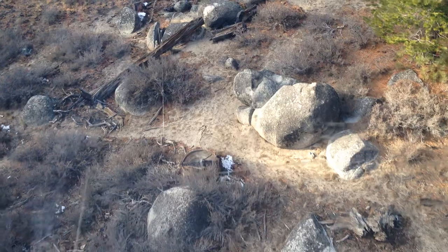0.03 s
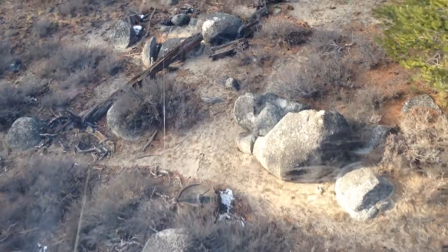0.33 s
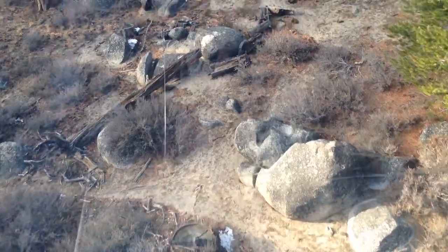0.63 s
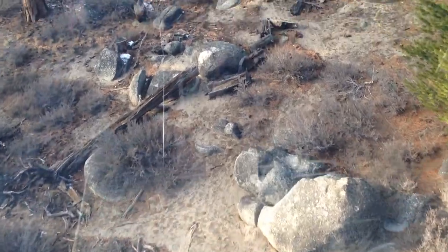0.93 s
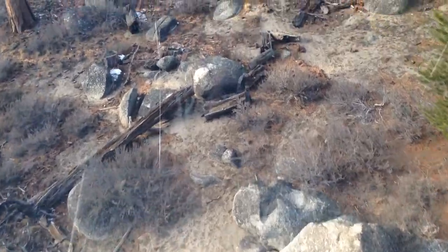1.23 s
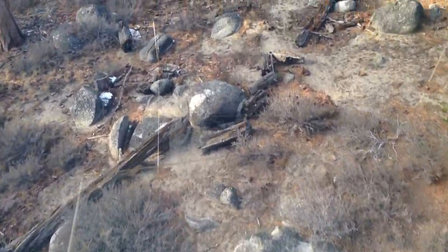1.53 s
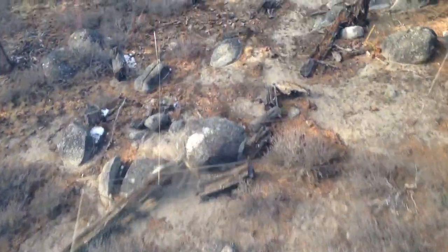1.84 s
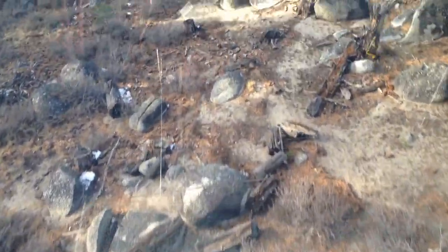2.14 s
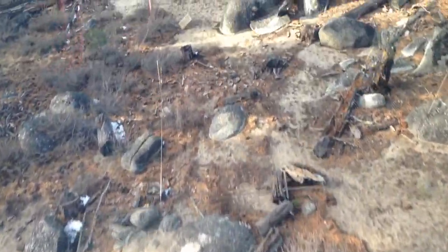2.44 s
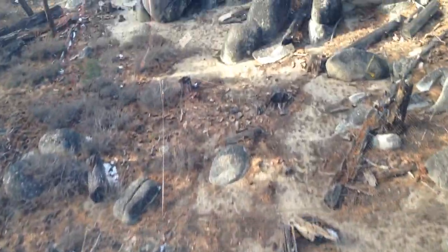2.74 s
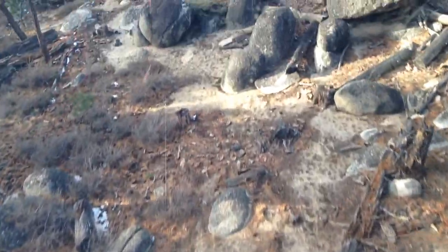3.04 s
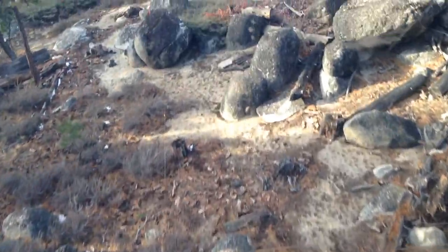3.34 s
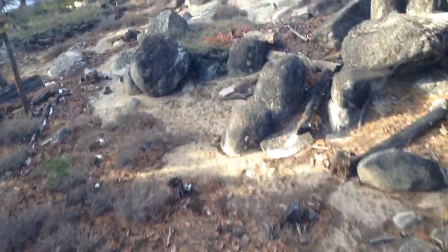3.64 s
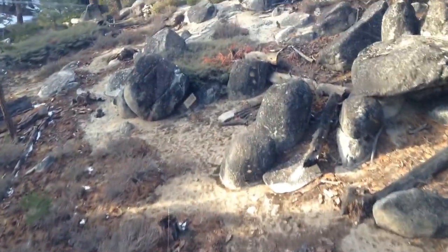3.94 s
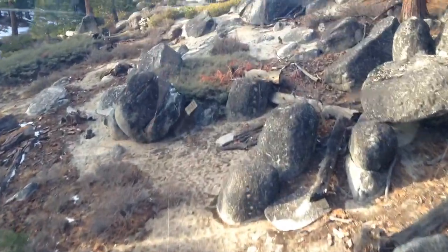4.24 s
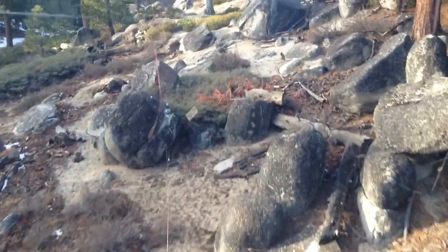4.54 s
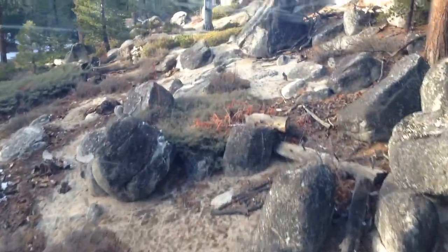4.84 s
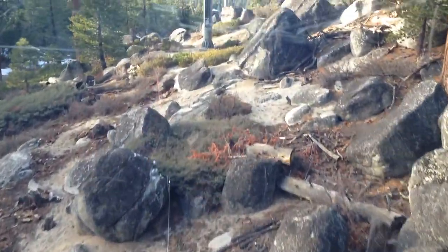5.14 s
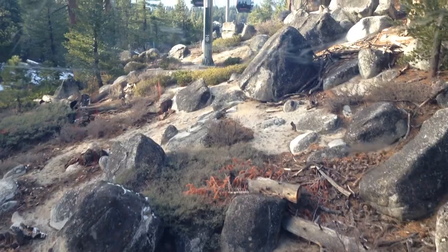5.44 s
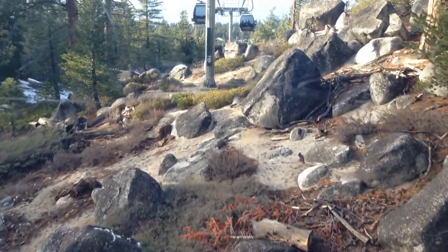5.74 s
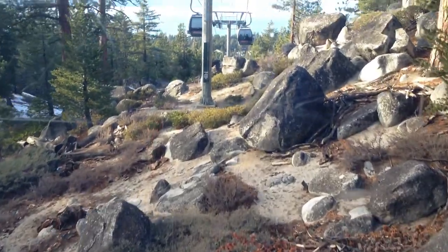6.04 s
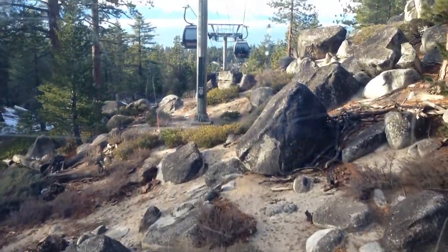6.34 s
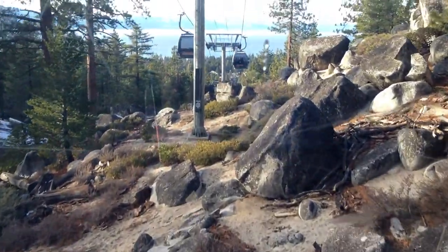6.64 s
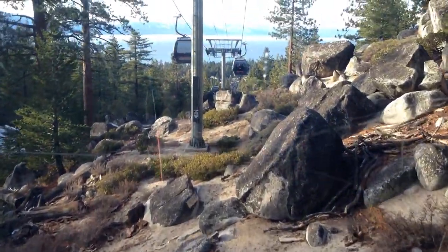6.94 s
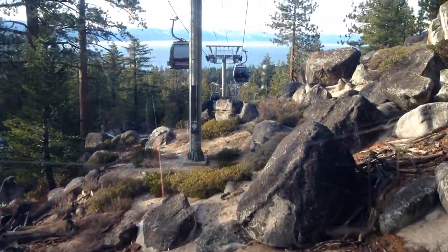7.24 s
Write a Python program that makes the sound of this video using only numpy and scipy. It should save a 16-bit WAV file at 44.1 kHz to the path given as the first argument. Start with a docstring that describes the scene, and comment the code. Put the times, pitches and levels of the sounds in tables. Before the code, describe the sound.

Heard from within a moving cable car, a soft, unevenly throbbing low drone fills the cabin while air slides faintly past outside. Small thuds and ticks come now and then. Late on, a single sharp clunk, by far the loudest sound, shakes the panels and a loose fitting. About a second later there is a tiny snap, then a faint rustle of clothing and a few more ticks over the continuing rumble.

```python
"""Inside a small gondola cabin gliding up a mountainside on its cable.
From the start the rope's vibration rumbles in the shell and booms in the cabin air; wind rushes faintly.
For five seconds the cabin heaves now and then, while the floor bumps, fittings tick and cloth rustles.
At 5.4 s, after a faint, brief lead-in of noise, one hard clunk rings the panels and rattles a fitting.
A tiny bright snap follows at 6.4 s, and the ride rumbles on with a few more ticks and a rustle."""
import sys
import numpy as np
from scipy import signal
from scipy.fft import rfft, irfft, next_fast_len
from scipy.io import wavfile
from scipy.ndimage import uniform_filter1d

SR = 44100
rng = np.random.default_rng(int(sys.argv[2]) if len(sys.argv) > 2 else 0)


def wav_out(sig):
    """Save sig, one row per channel (or a flat mono array), as 16-bit PCM at SR to the path in sys.argv[1]."""
    wavfile.write(sys.argv[1], SR, np.round(np.clip(np.atleast_2d(sig).T, -1, 1) * 32767).astype(np.int16))


N = 325899
TIME = np.arange(N) / SR

# spectra of the microphone hiss and the air rush: frequency_hz, relative_density_db
HISS_SPECTRUM = [(1000, -3), (2000, 0), (2700, -3.5), (3500, -0.5), (5000, -1.5), (8000, -3), (12000, -4),
                 (16000, -4.5)]
WIND_SPECTRUM = [(180, 10.5), (300, -6.5), (450, 1), (600, -4.5), (850, -7), (1200, -13), (1900, -19),
                 (2700, -26), (5000, -39)]
# air sliding past the shell: time_s, level_db
WIND_LEVEL = [(0.1, -57.5), (1.6, -62), (2.0, -60), (2.35, -65), (2.7, -58.5), (3.1, -61.5), (4.9, -59.5),
              (6.25, -64.5), (6.55, -60.5), (7.38, -61)]
# narrow tones that the running rope keeps up in the hanger: pitch_hz, width_hz, level_db
HANGER_MODES = [(301.9, 20.5, -63.5), (274, 32, -67.5), (348.8, 29, -69), (409, 44, -71), (533.3, 7.5, -78),
                (801, 14, -80.5)]
# resonances of cabin air and shell: pitch_hz, width_hz, relative_db
SWAY_MODES = [(33.1, 9.3, -10.5), (50, 51, -5)]
BOOM_MODES = [(89.5, 12, 5), (69.8, 27, -8)]
DRONE_MODES = [(118.5, 19.5, 1), (148.7, 33.2, 0), (181.4, 37, -10.5), (234.7, 19, -12)]
# how hard the running rope drives the boom: time_s, relative_db
ROPE_DRIVE = [(0.1, -43), (0.35, -44), (0.72, -40), (1.05, -48.5), (1.45, -47), (2.2, -43.5), (2.65, -41),
              (3.15, -45), (3.7, -34.5), (4.0, -41), (4.25, -40), (4.75, -41), (5.1, -45), (5.72, -37.5),
              (5.88, -48), (6.15, -38.5), (6.68, -45.5), (7.38, -38.5)]
# gusts and tugs of the rope that make the cabin heave: centre_s, level_db, pitch_hz
HEAVES = [(0.43, -38, 42), (0.535, -33, 58), (0.8, -43, 36), (1.87, -42, 127), (2.209, -37, 128),
          (2.68, -36, 87.6), (3.08, -37.5, 71), (3.23, -40.5, 86), (3.55, -37, 73), (3.832, -34.5, 92.6),
          (4.14, -36.5, 97.5), (4.68, -42, 92)]
# dull bumps through the floor: start_s, level_db
BUMPS = [(0.43, -63), (1.49, -62), (1.71, -63), (2.082, -58.5), (2.153, -58.5), (2.39, -64.5), (2.67, -60),
         (3.895, -62), (6.42, -62)]
# light ticks and, at 5.432 s, a faint, brief lead-in of noise just before the clunk: start_s, relative_db
BURSTS = [(2.0806, -73), (2.1524, -72), (3.0045, -79), (4.096, -75), (4.8428, -73), (5.432, -57.5),
          (6.494, -75), (6.5978, -69), (7.1201, -65.5)]
# spectra of soft bumps and of hard or rubbing contact: frequency_hz, relative_density_db
BUMP_SPECTRUM = [(250, -10), (600, 8), (1100, 1), (1800, -9), (2600, -15), (6000, -41)]
CONTACT_SPECTRUM = [(300, 7), (1000, 16), (1900, 15.5), (2700, 14.5), (3600, 13.5), (5500, 12.5),
                    (8000, -3), (15000, -40)]
# soft rubbing of cloth: centre_s, length_s, level_db
RUSTLES = [(2.15, .1, -79), (4.067, 0.07, -69), (6.758, 0.29, -70.5)]
# a tiny bright double snap: start_s, relative_db, pitch_hz
SNAPS = [(6.4138, -57, 13500), (6.4186, -43, 6600)]
# a loose metal fitting striking its seat: start_s, relative_db
RATTLE_HITS = [(3.0045, -68), (5.451, -41), (5.478, -46), (5.497, -56), (5.522, -55)]
# resonances of that fitting: pitch_hz, width_hz, relative_db
RATTLE_MODES = [(2020, 200, -0.5), (2340, 230, -3.5), (3200, 140, -15), (3930, 280, -30)]
# the clunk and its rebounds: start_s, relative_db
CLUNK_HITS = [(5.4395, -7), (5.443, 1.5), (5.4520, -11), (5.464, -2.5), (5.4740, -24), (5.4815, -31),
              (5.549, -32)]
# modes of the wall panels: pitch_hz, relative_db, t60_s
PANEL_MODES = [(99, -6, .48), (149, -2, .3), (165, -7, .4), (190, -7, .24), (218, -6, .3), (273, -9, .36),
               (308, -7, .24), (342, -11, .23), (367, -17, .42), (400, -9, .2), (426, -6, .34),
               (445, -9, .23), (468, -12, .28), (496, -7, .2), (532, -17, .25), (615, -15, .22),
               (660, -13.5, .29), (711, -12, .18), (742, -15, .18), (812, -14, .18), (853, -16, .22),
               (984, -19, .22), (1026, -19, .19), (1135, -20, .21), (1578, -23, .19), (1750, -26, .2),
               (1795, -25, .22), (1915, -23, .22), (2026, -26, .22), (2090, -26, .2), (2343, -24, .19),
               (2730, -31, .18), (3330, -32, .19)]
# dense ring of shell and cabin after a blow: frequency_hz, relative_density_db
SHELL_SPECTRUM = [(100, 4), (200, -12), (450, 6.5), (600, -12), (780, -5), (1100, -12), (1300, -9.5),
                  (2100, -16), (2600, -21.5), (3700, -24), (4300, -30), (5500, -26), (6700, -32.5),
                  (8000, -40.5), (15000, -56)]
# decay of that ring: frequency_hz, t60_s
SHELL_DECAY = [(100, 0.6), (200, 0.34), (400, 0.23), (1000, 0.18), (2000, 0.17), (4000, 0.13),
               (12000, 0.14)]


def from_db(db):
    """Amplitude grows tenfold with every 20 dB."""
    return 10 ** (np.asarray(db) / 20)


def unit_power(x):
    """Division by the RMS value leaves a mean power of one."""
    return x / np.sqrt(np.mean(x ** 2) + 1e-20)


def steady(x, span_s):
    """Division by the running RMS value evens out the slow swells of a noise."""
    return x / np.sqrt(uniform_filter1d(x ** 2, int(span_s * SR)) + 1e-12)


def in_time(curve):
    """Linear interpolation gives a curve's value at every sample."""
    return np.interp(TIME, *np.transpose(curve))


def at_hz(table, hz):
    """Interpolation on a log-frequency axis gives each octave equal room."""
    frequencies, values = np.transpose(table)
    return np.interp(np.log(hz + 1e-9), np.log(frequencies), values)


def shaped_noise(gain_at):
    """Filtered white noise takes on the spectrum of its filter; the result has unit power."""
    size = next_fast_len(N, real=True)
    hz = np.arange(size // 2 + 1) * SR / size
    white = rfft(rng.standard_normal(size))
    return unit_power(irfft(white * gain_at(hz), size)[:N])


def coloured(spectrum):
    """Spectral shaping: noise follows the table and falls 18 dB per octave below its first point."""
    lowest_hz = spectrum[0][0]
    return shaped_noise(lambda hz: from_db(at_hz(spectrum, hz)) * np.minimum(hz / lowest_hz, 1) ** 3)


def wander(rate_hz):
    """Band-limited noise fluctuates smoothly, with unit spread, at rates near rate_hz."""
    return shaped_noise(lambda hz: hz * np.exp(-np.minimum(hz / rate_hz, 10) ** 2 / 2))


def resonating(modes):
    """Under random forcing each resonance passes a narrow band of noise."""
    out = 0
    for hz, width_hz, db in modes:
        edges_hz = [max(hz - width_hz / 2, 10), hz + width_hz / 2]
        band = signal.butter(2, edges_hz, "band", fs=SR, output="sos")
        settled = signal.sosfilt(band, rng.standard_normal(N + SR))[SR:]
        out = out + from_db(db) * unit_power(settled)
    return out


def swell(centre_s, length_s):
    """A Gaussian envelope rises and falls symmetrically about its centre."""
    return np.exp(-np.minimum((2 * (TIME - centre_s) / length_s) ** 2, 20))


def impulses(rows):
    """A brief excitation acts as an impulse, one for each (start_s, level_db)."""
    out = np.zeros(N)
    for start_s, db in rows:
        out[round(start_s * SR)] += from_db(db)
    return out


def decay(hits, t60_s):
    """Energy adds with each impulse and drains exponentially; the envelope is its square root."""
    energy_kept = 10 ** (-6 / (t60_s * SR))
    return np.sqrt(signal.lfilter([1], [1, -energy_kept], hits ** 2 + 1e-24))


def ring(force, hz, t60_s):
    """A damped oscillator answers a unit impulse with a dying sine of height one."""
    radius, angle = from_db(-60 / (t60_s * SR)), 2 * np.pi * hz / SR
    feedback = [1, -2 * radius * np.cos(angle), radius ** 2]
    return signal.lfilter([0, np.sin(angle)], feedback, force + 1e-18)


def wind(flutter_db, flutter_hz):
    """Flow noise: air sliding past the shell makes a broad rush that flutters slightly."""
    level_db = in_time(WIND_LEVEL) + flutter_db * wander(flutter_hz)
    return from_db(level_db) * coloured(WIND_SPECTRUM)


def rope_rumble(sway_db, drone_db, boom_gain_db, throb_db, throb_hz):
    """Forced vibration: the rope drives shell, cabin air and hanger, and the boom throbs unevenly."""
    boom_db = in_time(ROPE_DRIVE) + boom_gain_db + throb_db * np.tanh(wander(throb_hz))
    sway = from_db(sway_db) * steady(resonating(SWAY_MODES), span_s=0.2)
    boom = from_db(boom_db) * steady(resonating(BOOM_MODES), span_s=0.16)
    drone = from_db(drone_db) * steady(resonating(DRONE_MODES), span_s=0.24)
    return sway + boom + drone + resonating(HANGER_MODES)


def heaves(length_s, relative_bandwidth):
    """Transient forcing: each gust or tug of the rope raises a short, deep swell of narrow-band noise."""
    out = 0
    for centre_s, db, hz in HEAVES:
        shudder = steady(resonating([(hz, relative_bandwidth * hz, 0)]), span_s=0.05)
        out = out + from_db(db) * swell(centre_s, length_s) * shudder
    return out


def floor_bumps(t60_s):
    """Soft impacts carry little treble, so jolts thud dully in the floor."""
    return coloured(BUMP_SPECTRUM) * decay(impulses(BUMPS), t60_s)


def bursts_and_rustles(burst_t60_s, echo_db, echo_t60_s):
    """Reverberation and friction: ticks and the clunk's faint lead-in echo; cloth rubs in grainy swells."""
    onsets = impulses(BURSTS)
    bursts = decay(onsets, burst_t60_s) + from_db(echo_db) * decay(onsets, echo_t60_s)
    rubbing = sum(from_db(db) * swell(centre_s, length_s) for centre_s, length_s, db in RUSTLES)
    grain = unit_power(uniform_filter1d(rng.exponential(1, N) ** 3, size=150))
    return coloured(CONTACT_SPECTRUM) * (bursts + rubbing * grain)


def snaps(contact_t60_s, echo_db, echo_t60_s, ring_db):
    """A small hard part radiates little below its lowest mode: its click is all treble, briefly echoed."""
    out = 0
    for start_s, db, hz in SNAPS:
        hit = impulses([(start_s, db)])
        envelope = decay(hit, contact_t60_s) + from_db(echo_db) * decay(hit, echo_t60_s)
        burst = rng.standard_normal(N) * envelope
        click = burst + from_db(ring_db) * ring(burst, hz, t60_s=0.003)
        highpass = signal.cheby1(10, 1, 0.95 * hz, "high", fs=SR, output="sos")
        out = out + signal.sosfilt(highpass, click)
    return out


def rattle(t60_s, buzz_db, buzz_centre_s, buzz_length_s):
    """Repeated impacts excite a loose fitting's modes, hardest just after the clunk; then it buzzes."""
    chatter = decay(impulses(RATTLE_HITS), t60_s)
    buzz = from_db(buzz_db) * swell(buzz_centre_s, buzz_length_s)
    return resonating(RATTLE_MODES) * (chatter + buzz)


def panel_ring(travel_s):
    """Bending waves from the blow reach each panel in their own time and leave it in free vibration."""
    arrivals_s = CLUNK_HITS[0][0] + travel_s * rng.random(len(PANEL_MODES))
    out = 0
    for k, (hz, db, t60_s) in enumerate(PANEL_MODES):
        polarity = (-1) ** k
        out = out + polarity * ring(impulses([(arrivals_s[k], db)]), hz, t60_s)
    return out


def shell_ring():
    """Modal overlap: blow and rebounds stir countless modes, heard as noise that dies band by band."""
    hits, dense_modes = impulses(CLUNK_HITS), coloured(SHELL_SPECTRUM)
    edges_hz = np.geomspace(70, 17000, 9)
    out = 0
    for low, high in zip(edges_hz, edges_hz[1:]):
        band = signal.butter(3, [low, high], "band", fs=SR, output="sos")
        t60_s = at_hz(SHELL_DECAY, np.sqrt(low * high))
        out = out + signal.sosfilt(band, dense_modes) * decay(hits, t60_s)
    return out


def clunk(panel_gain_db, shell_gain_db, crack_gain_db, crack_t60_s):
    """Impulse response: a hard blow cracks at first contact and rings on in panels and shell."""
    panels = from_db(panel_gain_db) * panel_ring(travel_s=0.003)
    shell = from_db(shell_gain_db) * shell_ring()
    crack = coloured(CONTACT_SPECTRUM) * decay(impulses(CLUNK_HITS[:1]), crack_t60_s)
    return panels + shell + from_db(crack_gain_db) * crack


def scene():
    """Superposition: the sounds of all sources add at a seat in the cabin."""
    cabin = wind(flutter_db=0.36, flutter_hz=5.6)
    cabin += rope_rumble(sway_db=-48.5, drone_db=-50, boom_gain_db=-2, throb_db=2.5, throb_hz=4.8)
    cabin += heaves(length_s=0.055, relative_bandwidth=0.36)
    cabin += floor_bumps(t60_s=0.26)
    cabin += bursts_and_rustles(burst_t60_s=0.044, echo_db=3.5, echo_t60_s=0.16)
    cabin += snaps(contact_t60_s=0.011, echo_db=-13, echo_t60_s=0.17, ring_db=-14)
    cabin += rattle(t60_s=0.082, buzz_db=-78, buzz_centre_s=5.89, buzz_length_s=0.6)
    cabin += clunk(panel_gain_db=-18, shell_gain_db=-26, crack_gain_db=-28, crack_t60_s=0.042)
    return cabin[None]


def record(dry):
    """Self-noise and limited bandwidth: the microphone hisses, opens after a moment and loses the top."""
    hiss_db, start_s, cutoff_hz = -68, 0.084, 15350
    live = (dry + from_db(hiss_db) * coloured(HISS_SPECTRUM)) * (TIME >= start_s)
    lowpass = signal.ellip(12, 0.1, 80, cutoff_hz, fs=SR, output="sos")
    return signal.sosfilt(lowpass, live)


dry = scene()
out = record(dry)
wav_out(out)
```